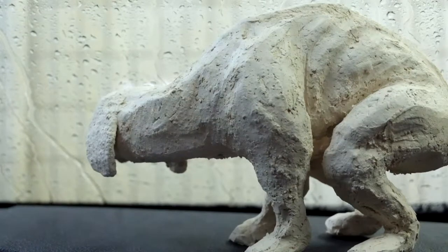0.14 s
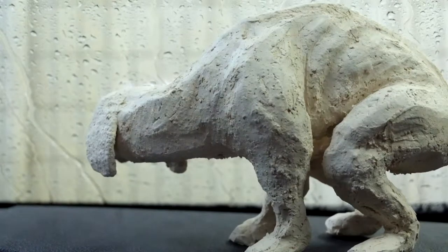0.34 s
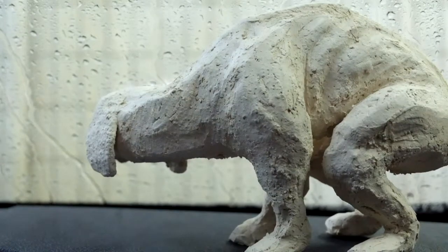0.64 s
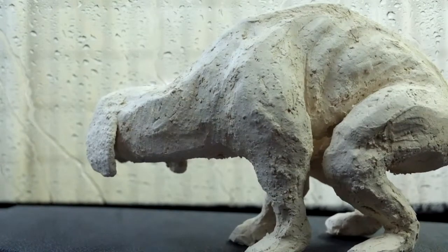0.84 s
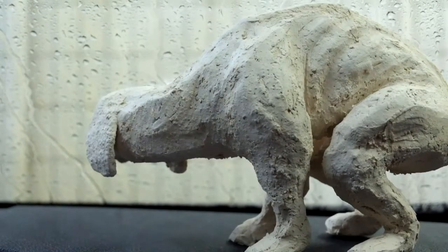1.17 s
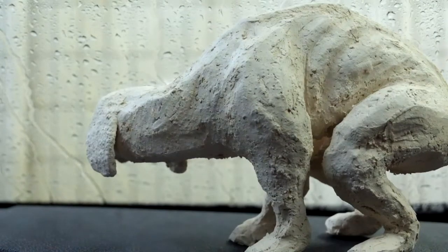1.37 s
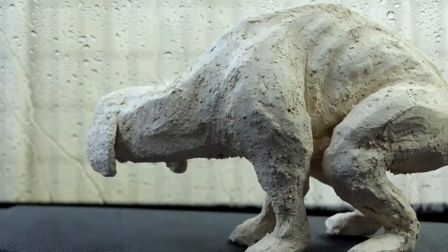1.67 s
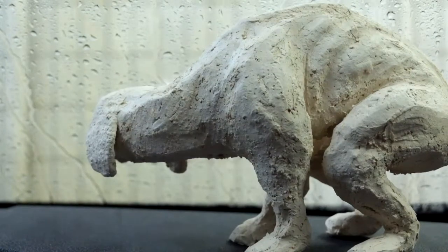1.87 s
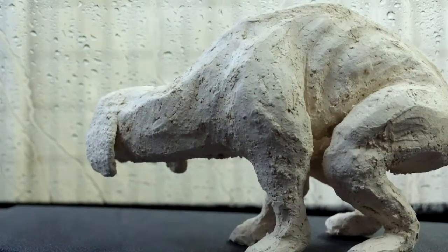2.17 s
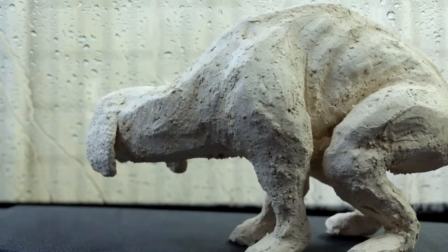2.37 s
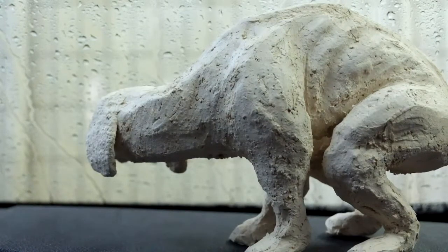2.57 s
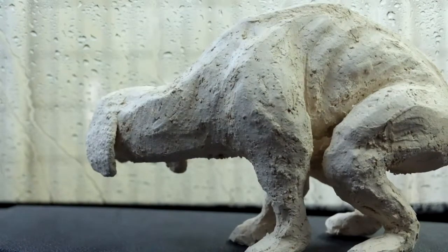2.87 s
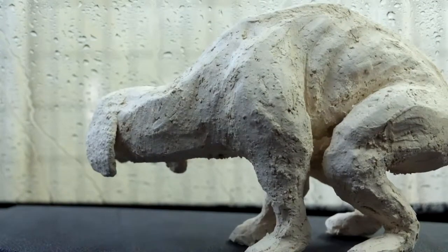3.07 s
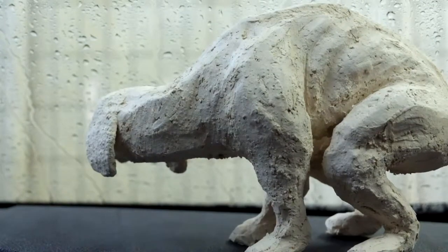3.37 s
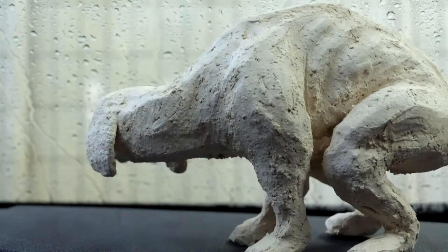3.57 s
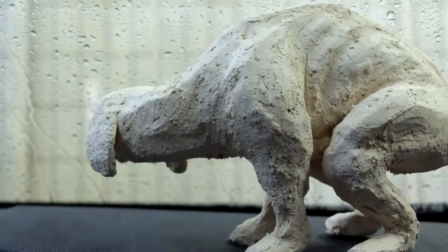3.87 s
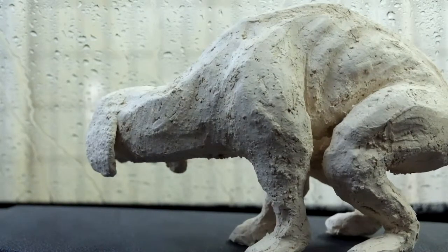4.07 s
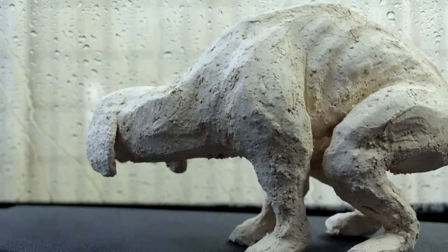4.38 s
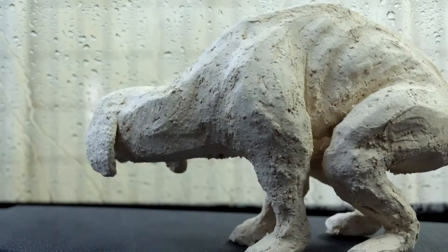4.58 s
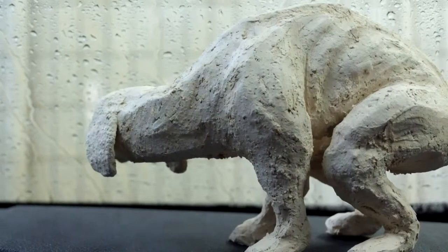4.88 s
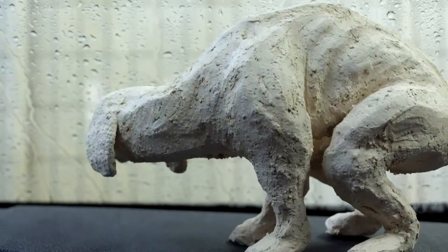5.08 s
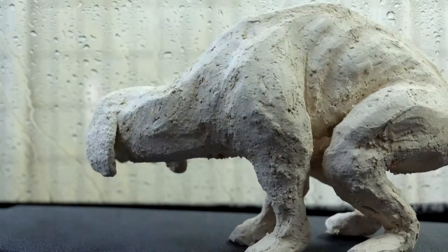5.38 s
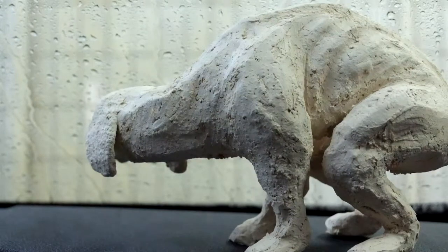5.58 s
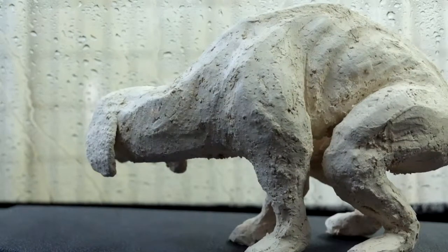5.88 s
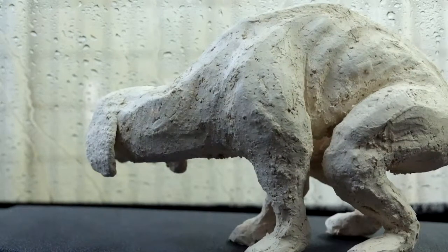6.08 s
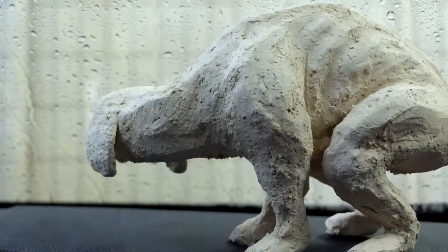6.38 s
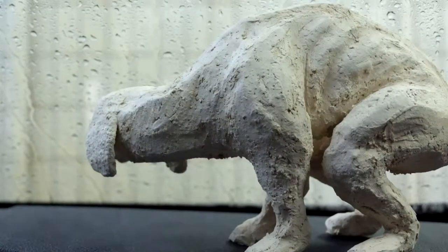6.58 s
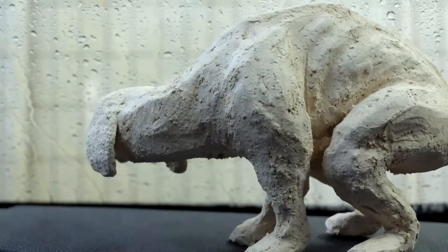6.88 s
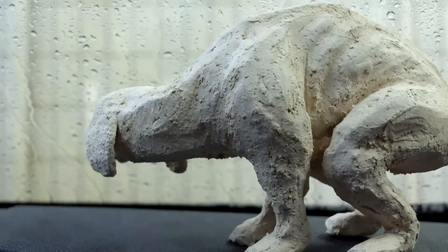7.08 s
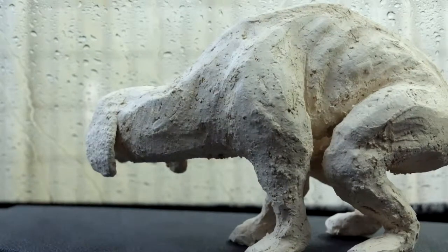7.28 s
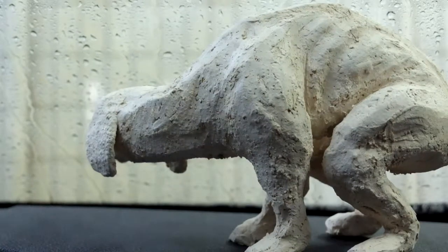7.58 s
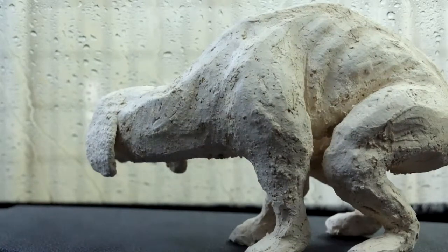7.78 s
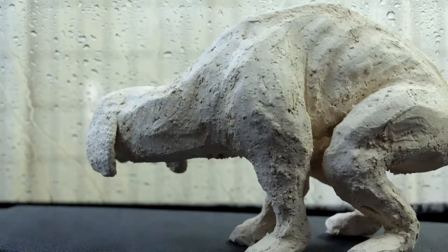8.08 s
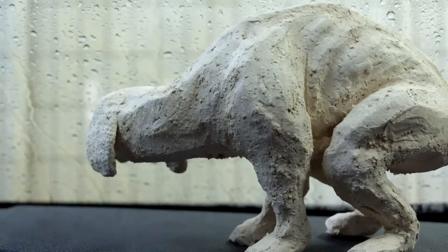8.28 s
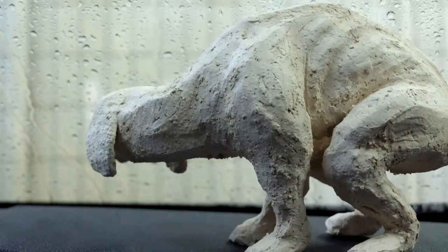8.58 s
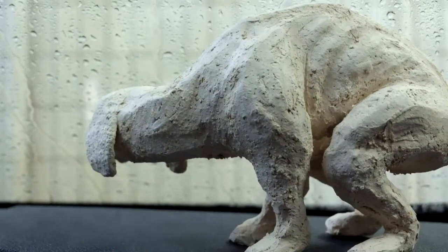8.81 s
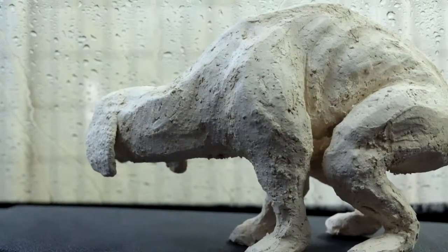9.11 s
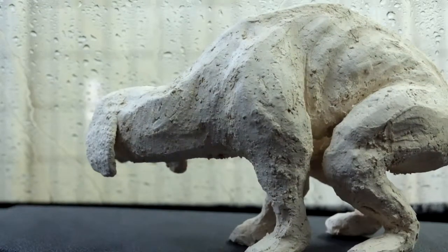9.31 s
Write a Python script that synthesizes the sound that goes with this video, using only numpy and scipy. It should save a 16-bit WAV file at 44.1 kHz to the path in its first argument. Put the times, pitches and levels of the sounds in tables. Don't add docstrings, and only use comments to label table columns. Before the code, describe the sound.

Inside a closed car in an automatic wash, deep machinery rumble and droning panels under rapid wet brush strips slapping the glass and rushing water.

```python
import sys
import numpy as np
from scipy import signal
from scipy.fft import rfft, irfft, next_fast_len
from scipy.io import wavfile
from scipy.ndimage import uniform_filter1d

SR = 44100
rng = np.random.default_rng(int(sys.argv[2]) if len(sys.argv) > 2 else 0)


def field_ratio(decibels):
    return 10 ** (np.asarray(decibels, dtype=float) / 20)


def materialize(psi):
    bounded = np.clip(np.atleast_2d(psi).T, -1, 1)
    quanta = np.round(bounded * 32767).astype(np.int16)
    wavfile.write(sys.argv[1], SR, quanta)


N = 416744
FREQ = np.fft.rfftfreq(next_fast_len(N + SR), 1 / SR)


# time_s, strips_landed [count so far]
BRUSH_TURNING = [
    (0.0, 0),
    (1.695, 38),
    (2.912, 65),
    (7.284, 164),
    (9.45, 213),
]
STRIP_WEIGHT = [1, -2, -1, 1, 0, -0.5, 0, 0.5, 0, -4, -0.5, -2]


def strip_landings():
    time_s, landed = np.transpose(BRUSH_TURNING)
    number = np.arange(1, landed[-1]).astype(int)
    chance = rng.standard_normal((len(number), 4)).T
    times = np.interp(number, landed, time_s) + 0.0058 * chance[0]
    bite_db = curves(BRUSH_CONTACT)[1][(times * SR).astype(int)]
    weight_db = np.array(STRIP_WEIGHT)[number % len(STRIP_WEIGHT)] + bite_db
    heaviest = 0.7
    return times, weight_db, np.minimum(chance[1:], heaviest)


def blows(times, db, lead_s, rise_s, drag_s, fall_s):
    kicks = np.zeros(N)
    np.add.at(kicks, ((times - lead_s) * SR).astype(int), field_ratio(db))
    t = np.arange(SR // 8) / SR
    landing = 1 - np.exp(-t / rise_s)
    peeling = np.exp(-np.maximum(t - drag_s, 0) / fall_s)
    return signal.fftconvolve(kicks, landing * peeling)[:N]


def with_heavy(times, columns, heavy):
    heavy = np.transpose(heavy)
    lead_s, gap_s = 0.008, 0.022
    free = np.abs(times[:, None] - heavy[0] - lead_s).min(axis=1) > gap_s
    return [np.r_[ordinary[free], strong] for ordinary, strong in zip([times - lead_s, *columns], heavy)]


# start_s, level_db
HEAVY_THUMPS = [(0.115, -27.5), (0.204, -29), (0.256, -31), (0.3, -28.5), (0.436, -29.5), (0.66, -31),
                (1.955, -24), (2.092, -24), (2.146, -25), (2.234, -24), (2.374, -23), (2.998, -26.5),
                (3.333, -25.5), (3.628, -23.5), (3.659, -25), (4.102, -25), (4.815, -25.5), (4.926, -27),
                (5.2, -27), (5.553, -33), (6.092, -26), (6.178, -28.5), (6.265, -26), (6.516, -27),
                (6.613, -28), (7.704, -26), (7.764, -24), (8.647, -24), (9.044, -25), (9.233, -20)]
# pitch_hz, width_hz, level_db
GLASS_MODES = [(643, 108, -6), (691, 78, -3), (784.7, 95, 2.5), (921, 187, -6.5), (1059, 174, -4.5),
               (1283, 122, -11.5)]


def thumped_glass(landings, weight_db, chance, flutter):
    rush = field_ratio(driven_level(-42, 0.51, 0.56) + 1.2 * flutter)
    at = (landings * SR).astype(int)
    thump_db = driven_level(-37.5, 0.056, 1.2)[at] + weight_db + 3.5 * chance[0]
    times, thump_db = with_heavy(landings, [thump_db + 5], HEAVY_THUMPS)
    thump = blows(times, thump_db - 8.0, lead_s=0.0016, rise_s=0.0024, drag_s=0.011, fall_s=0.0097)
    return np.hypot(rush, thump) * steadied(ring(1, GLASS_MODES), 0.015, 0.26)


# start_s, level_db, spatter_db [fine spatter relative to the splash]
BIG_SPLASHES = [(1.6044, -42, -10), (1.957, -31.5, -13), (2.0148, -37, -13), (2.0524, -40, -2.5),
                (2.0921, -37, -14), (2.4564, -34.5, -14), (2.9497, -38.5, -6), (3.2221, -37.5, -9),
                (3.4374, -37, -9), (3.489, -36.5, -8), (3.632, -34, -13), (3.7404, -34, -11),
                (3.822, -36, -8), (4.283, -34, -9), (4.3914, -38, -5.5), (4.4864, -37, -9),
                (4.8184, -35.5, -12), (5.022, -34.5, -3), (5.1497, -38, -7), (5.4484, -36, -9.5),
                (5.8272, -35.5, -14), (5.8731, -35, -10), (6.3374, -33, -22), (6.5174, -33.5, -17),
                (6.7044, -33, -12), (6.962, -32.5, -7), (7.0035, -34.5, -10), (7.225, -32, -12),
                (7.8875, -32, -17), (9.1167, -34, -5)]
# pitch_hz, width_hz, level_db
TRIM_MODES = [(1483, 464, 3.5), (1604, 85, 6.5), (1699, 140, 1.5), (1989, 293, 1), (2274, 246, 4),
              (2470, 460, -2.5), (2872, 440, -2)]
# pitch_hz, width_hz, level_db
DROP_BANDS = [(3236, 700, 1.5), (3590, 740, 0), (4160, 890, -1), (4850, 1030, -4.5), (5670, 1300, -9.5),
              (6360, 1870, -12), (9350, 5300, -22.5)]


def splashing_water(landings, weight_db, chance, flutter):
    at = (landings * SR).astype(int)
    splash_db = driven_level(-48.5, 0.02, 1.43)[at] + weight_db + 3 * (0.38 * chance[0] + 0.86 * chance[1])
    columns = [splash_db + 5, -9.5 + 1.7 * chance[2]]
    times, splash_db, spatter_db = with_heavy(landings, columns, BIG_SPLASHES)
    splash = blows(times, splash_db - 7.5, lead_s=0.003, rise_s=0.0011, drag_s=0.012, fall_s=0.01)
    spatter = blows(times, splash_db + spatter_db - 4.5, lead_s=0.0026, rise_s=0.0011, drag_s=0.0092, fall_s=0.011)
    spatter = spatter * field_ratio(2.2 * walk(250))
    drained = blows(times, 0 * times, lead_s=0.021, rise_s=0.0033, drag_s=0.0071, fall_s=0.0036)
    spray = field_ratio(driven_level(-48.5, 0.061, 1.45) - 3.0 * drained)
    fine_spray = spray * field_ratio(-8.5 + 0.6 * flutter + 1.5 * walk(45))
    sheets = ring(np.hypot(spray * field_ratio(1.56 * flutter), splash), TRIM_MODES)
    return sheets + ring(np.hypot(fine_spray, spatter), DROP_BANDS)


def brush(landings, weight_db, chance):
    flutter = walk(30)
    glass = thumped_glass(landings, weight_db, chance, flutter)
    return glass + splashing_water(landings, weight_db, chance, flutter)


# pitch_hz, width_hz, level_db
BODY_MODES = [(33.2, 13, -5), (42, 7.4, 5), (57, 7, 5), (67.3, 16, -0.5)]
# pitch_hz, width_hz, level_db
CABIN_MODES = [(83.7, 25.6, -9), (110.5, 17.8, 0), (122.3, 14.3, 0), (135.2, 24.7, -2.5), (163.8, 15, -8.5),
               (179.7, 16.3, -3), (209.6, 21.5, -15.5), (239.3, 13.3, -11)]
# pitch_hz, width_hz, level_db
PANEL_MODES = [(300.8, 90.6, 1.5), (348, 80, 0), (392, 81.3, 1.5), (511, 115, -10.5), (595.6, 84, -8.5)]
# rate [per s], swell_db
SHELL_SURGES = [
    (6, 2.5),
    (8, 0.8),
    (8, 0.82),
]
# start_s, rumble_db, boom_db, drone_db [lift of each]
ROLLER_JOLTS = [(0.34, 1, 3, -2), (1.97, 7, 3, -0.5), (2.6, 7, 0.5, -5), (2.97, 6, 0.1, 2.5),
                (3.79, 13.5, 0, 1.5), (4.14, 8, 4, -2), (4.34, 9.5, 2, -2.5), (4.68, 1, 2, -3.5),
                (5.15, 3, -1, -0.5), (5.31, 2, 3, -3), (5.87, -6, 4, 3), (6.24, -2, 5.5, -3.5),
                (6.76, 1, 5.5, 1.5), (6.9, 1, 4.5, -2.5), (7.19, 5, 5, 3.5), (7.55, 9.5, 4, 2),
                (7.68, 6, 3, 0.1), (2.2, 6, 2, 2), (2.35, 10, 0.5, 1), (8.14, 5, 3, 0.5),
                (8.29, 10, -1, -2), (8.63, 6.5, 0, -1.5), (8.81, -8, 3, -2), (8.95, 8, 3, -2.5),
                (9.21, -3, 7.5, 4), (9.4, -1, 1, 2)]


def shell(landings):
    t = np.arange(N) / SR
    jolt_s = 0.025
    lift_db = np.zeros((3, N))
    for start_s, *db in ROLLER_JOLTS:
        lift_db += np.exp(-((t - start_s) / jolt_s) ** 2) * np.array(db)[:, None]
    lift_db[0] -= 4 * before_grip()
    levels = [driven_level(-37.5, 0.95, 0.39), driven_level(-33.5, 0.89, 0.044), driven_level(-36.5, 0.85, 0.05)]
    rumble, boom, drone = [field_ratio(level + lift + swell_db * walk(rate))
                           for level, lift, (rate, swell_db) in zip(levels, lift_db, SHELL_SURGES)]
    knock = 1 + 0.17 * blows(landings, 0 * landings, lead_s=0.011, rise_s=0.0027, drag_s=0.011, fall_s=0.023)
    return (rumble * steadied(ring(1, BODY_MODES), 0.077, 1.0)
            + boom * steadied(ring(1, CABIN_MODES), 0.13, 0.37)
            + drone * steadied(ring(knock, PANEL_MODES), 0.088, 0.32))


def before_grip():
    grip_s, rise_s = 1.93, 0.03
    return 1 / (1 + np.exp((np.arange(N) / SR - grip_s) / rise_s))


def gantry():
    modes = [(169, 58, 0.5), (596, 94, -6)]  # Hz, width Hz, dB
    return ring(before_grip() * field_ratio(driven_level(-41, 0.88, 0.05)), modes)


# pitch_hz, level_db [per Hz]
HISS_SPECTRUM = [(880, -6), (1500, -6), (1640, -10), (1930, -12), (7660, -24.5), (15500, -34.5)]


def hiss():
    noise = rng.standard_normal((2, N))
    noise = filtered(noise + 0.043 * noise[::-1], on_freq(HISS_SPECTRUM))
    treble = filtered(noise, FREQ > 5500)
    return noise * field_ratio(-68 + 2.5) / np.std(treble)


# time_s, level_db
MACHINE_LOAD = [(0.0, -28.5), (0.4, -32.5), (0.8, -36), (1.3, -38.5), (1.65, -35), (1.95, -30.5),
                (2.4, -32), (2.95, -34.5), (3.4, -31), (4.4, -31), (5.1, -31.5), (5.6, -32), (6.5, -31.5),
                (7.1, -28.5), (7.8, -25), (8.4, -22), (8.9, -22), (9.45, -23)]
# time_s, wetting_db, bite_db [of the strips, over the wetting]
BRUSH_CONTACT = [(0.0, -49, 0), (0.6, -52, -1.5), (1.3, -53, -6), (1.75, -51.5, -5), (2.0, -47, 5.5),
                 (2.3, -47.5, 1.5), (2.75, -50, 1.5), (3.1, -49.5, 4.5), (3.45, -47.5, 2.5),
                 (4.1, -48.5, 2), (5.0, -47.5, 2.5), (5.55, -48.5, 1), (6.4, -47.5, 1), (7.2, -46, 0),
                 (7.7, -45, -3), (8.3, -45.5, -3), (8.7, -43.5, -0.5), (9.45, -44.5, -2)]


def driven_level(offset_db, load_share, wet_share):
    load = curves(MACHINE_LOAD)[0]
    wet = curves(BRUSH_CONTACT)[0]
    return offset_db + load_share * (load - load.mean()) + wet_share * (wet - wet.mean())


def ring(force, modes):
    lead = SR // 4
    force = np.pad(force * np.ones(N), (lead, 0), "edge")
    force = np.pad(force, (0, 2 * len(FREQ) - 2 - len(force)))
    force = np.roll(force, -lead)
    return filtered(force * rng.standard_normal((2, len(force))), resonances(modes))


def resonances(modes):
    total = 0
    for k, (hz, width, db) in enumerate(modes):
        damping = 1j * FREQ * width
        total = total + (-1) ** k * field_ratio(db) * (damping / (hz ** 2 - FREQ ** 2 + damping)) ** 2
    return total / np.sqrt(np.mean(np.abs(total) ** 2))


def steadied(x, over_s, firmness):
    span = int(over_s * SR)
    swing = uniform_filter1d(uniform_filter1d(x ** 2, span), span)
    even = x / np.abs(swing) ** (firmness / 2)
    return even / np.std(even)


def walk(rate):
    k = int(SR / rate)
    return uniform_filter1d(np.repeat(rng.standard_normal(N // k + 1), k), k)[:N]


def curves(table):
    time_s, *columns = np.transpose(table)
    return [np.interp(np.arange(N) / SR, time_s, column) for column in columns]


def on_freq(table):
    hz, db = np.transpose(table)
    return field_ratio(np.interp(np.log(FREQ + 1), np.log(hz), db))


def filtered(x, response):
    size = 2 * len(FREQ) - 2
    return irfft(rfft(x, size) * response, size)[..., :N]


# pitch_hz, level_db
SCATTERED_SHARE = [(60, -23), (500, -20), (1000, -21), (2000, -16), (3000, -8.5), (4500, -4.5), (8000, 0.5)]
# pitch_hz, level_db
LEAN_TO_RIGHT = [(150, 0), (600, 0.17), (1200, .5), (4000, .5)]


def scene():
    landings, weight_db, chance = strip_landings()
    direct, scattered = brush(landings, weight_db, chance) + shell(landings) + gantry()
    share, lean = on_freq(SCATTERED_SHARE), on_freq(LEAN_TO_RIGHT)
    side = filtered(scattered, share)
    balance = np.array([1 / lean, lean]) / np.sqrt(1 + share ** 2)
    return filtered(np.array([direct + side, direct - side]), balance) + hiss()


def top_cut(x):
    return signal.sosfilt(signal.butter(12, 15630, fs=SR, output="sos"), x)


PORT_CORNERS = [3.3, 83.5]


def record(dry):
    ports = 1j * FREQ / (np.array(PORT_CORNERS)[:, None] + 1j * FREQ)
    return top_cut(filtered(dry, ports))


dry = scene()
out = record(dry)
materialize(out)
```